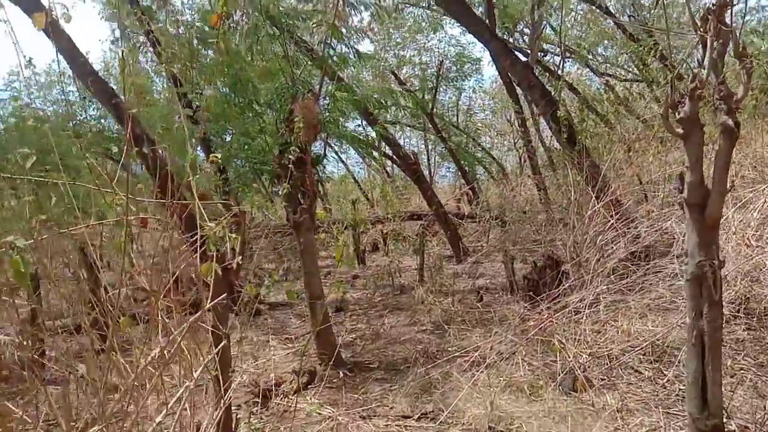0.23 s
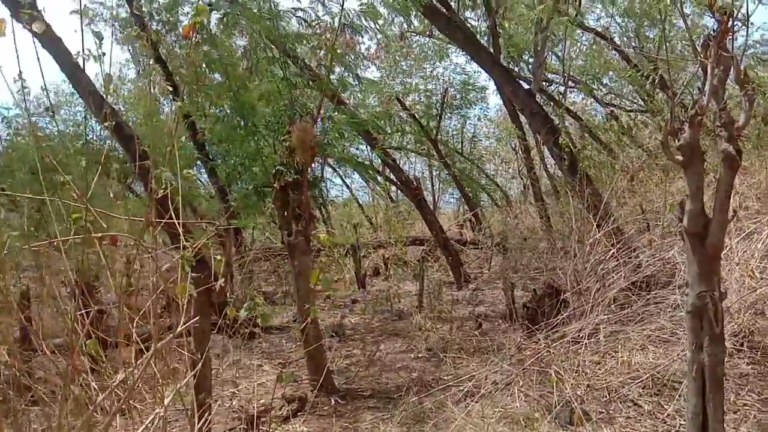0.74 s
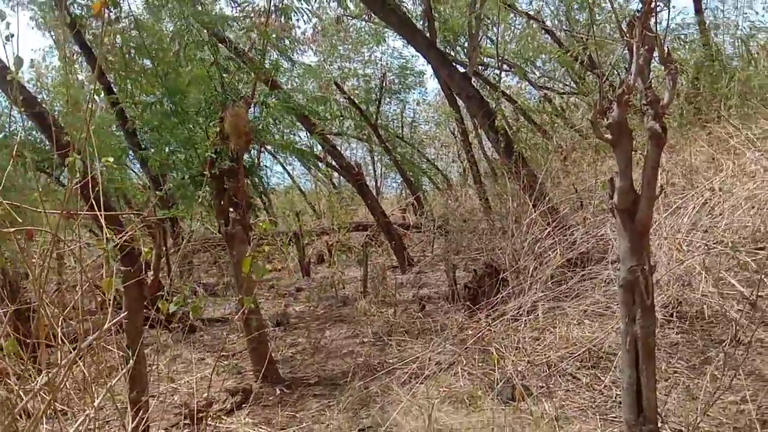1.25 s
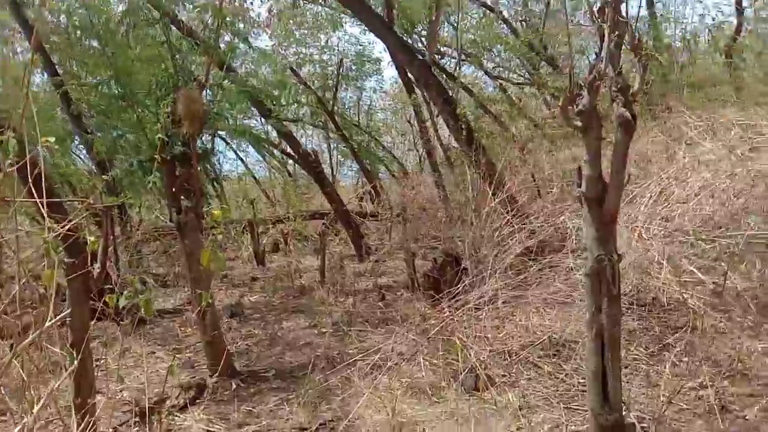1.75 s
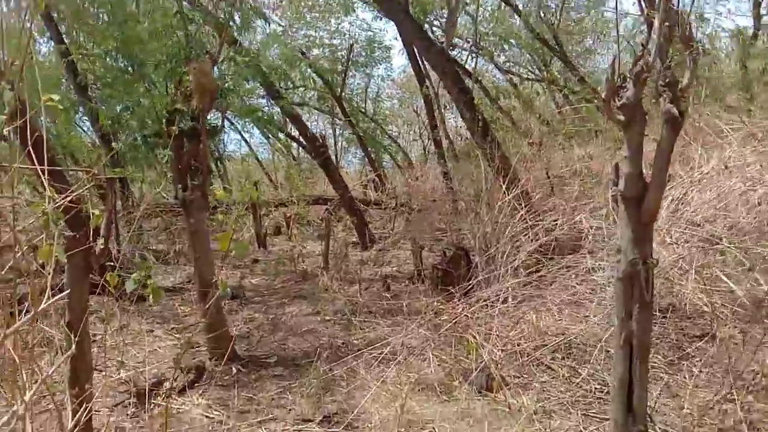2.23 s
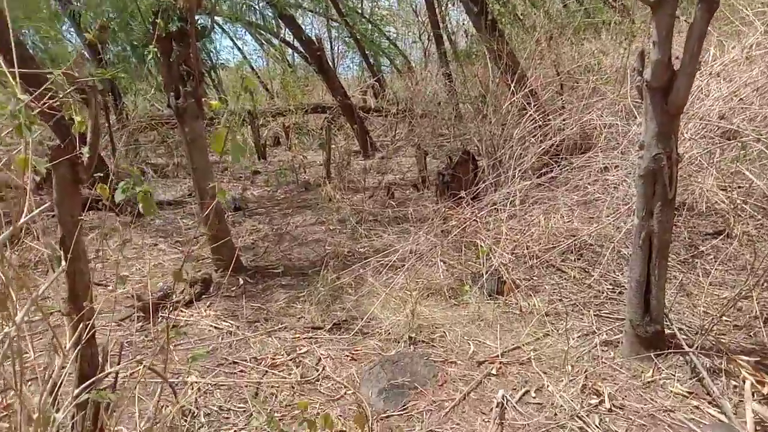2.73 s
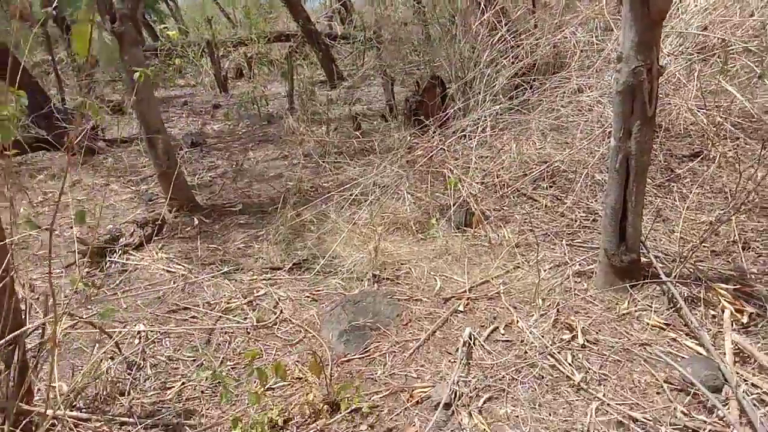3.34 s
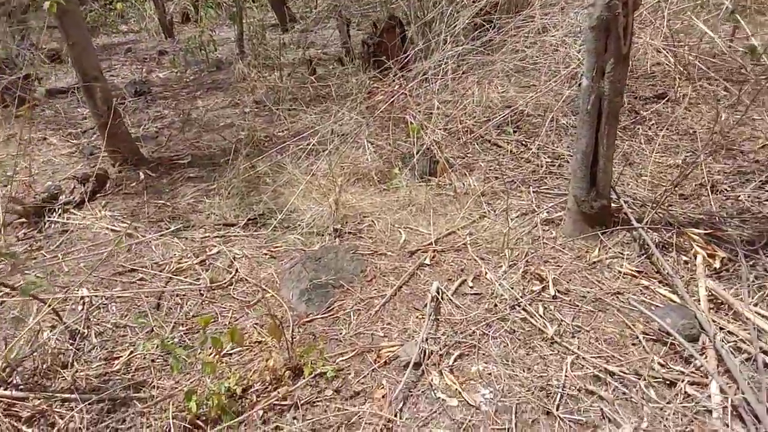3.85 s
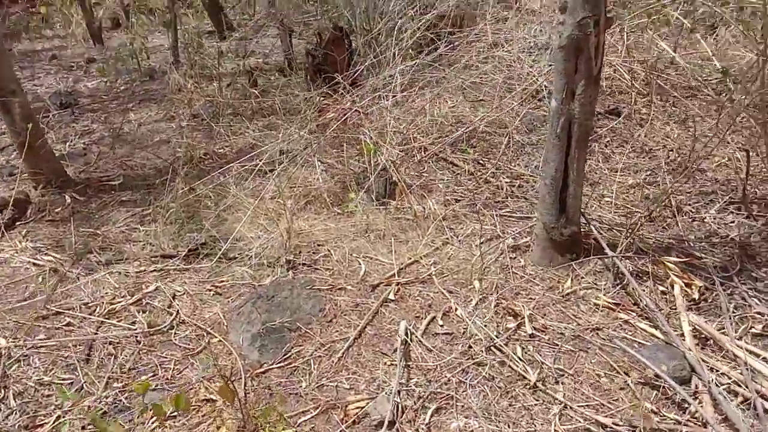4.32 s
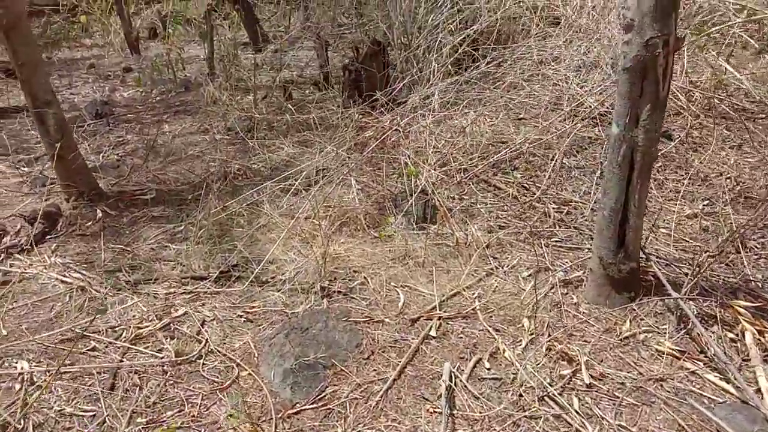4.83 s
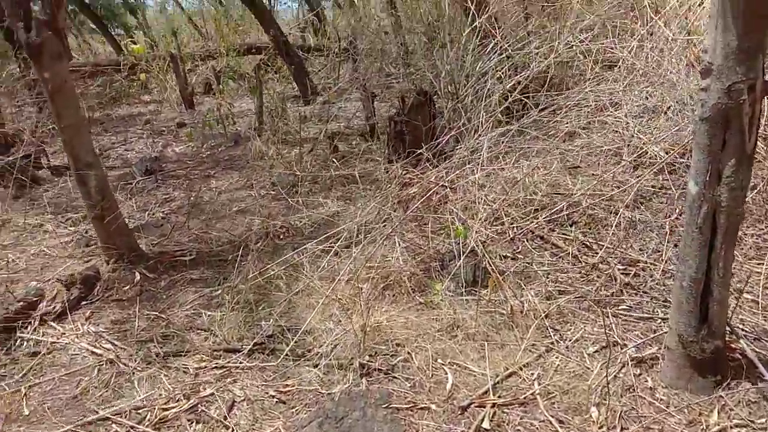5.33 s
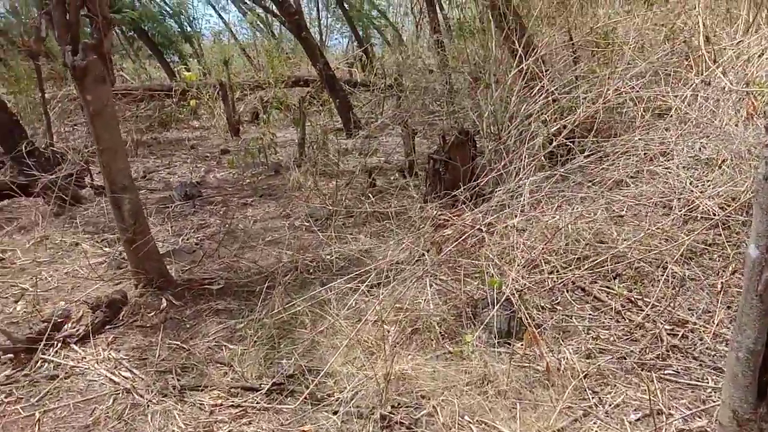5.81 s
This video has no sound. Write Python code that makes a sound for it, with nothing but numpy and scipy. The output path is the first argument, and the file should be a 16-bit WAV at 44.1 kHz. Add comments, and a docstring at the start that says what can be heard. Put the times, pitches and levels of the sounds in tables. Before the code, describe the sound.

Quiet dry woodland, with low air rumble and thin insect hiss. A few stalks rustle at first, with barely audible distant hoots, then a twig snaps. Soft bumps on the hand-held microphone follow. Around the middle, heavier steps crush dry grass into dense crisp crackle with woody snaps, and further crunching comes in bursts before fading to light rustle. The steps are close and central, from the ground below.

```python
"""Footsteps in dry woodland grass

Slow steps through dry grass and fallen twigs in quiet woodland, heard from a hand-held microphone.
Each step crushes stalks into a spray of tiny fractures; twigs snap as pulses with tearing fibres.
Stems scrape by stick and slip, and the hand bumps the case in low, short sways.
Filtered noise makes air rumble and far insect hiss; gliding tones make faint hoots.
The level dips briefly once near the start."""
import sys
import numpy as np
from scipy import signal
from scipy.fft import rfft, irfft
from scipy.io import wavfile
from scipy.ndimage import uniform_filter1d

SR = 44100
rng = np.random.default_rng(int(sys.argv[2]) if len(sys.argv) > 2 else 0)


def wav_record(signal):
    """Record a signal, one row per channel, as 16-bit PCM in the file named by sys.argv[1]."""
    frames = np.transpose(np.atleast_2d(signal))
    bounded = np.clip(frames, -1, 1)
    # unit amplitude maps onto the largest positive 16-bit level
    quanta = np.round(bounded * 32767).astype(np.int16)
    wavfile.write(sys.argv[1], SR, quanta)


N = 267775

# grass stirring between steps: crunch_db, crackle_db, splinters_db
STIR_LEVELS = (-63, -69, -83.5)


def from_db(db):
    """Decibels to an amplitude factor."""
    return 10 ** (np.asarray(db) / 20)


def rms_one(x):
    """Scale a sound to rms 1."""
    return x / np.sqrt(np.mean(x ** 2) + 1e-20)


def at_hz(points, hz):
    """Read a spectrum on a log-frequency axis."""
    point_hz, db = np.transpose(points)
    return np.interp(np.log(np.maximum(hz, 1)), np.log(point_hz), db)


def drift(rate_hz):
    """Slow random motion with rms 1: noise through two equal low-pass poles."""
    step = 40  # samples between drawn values
    pole = np.exp(-2 * np.pi * rate_hz * step / SR)
    noise = rng.standard_normal(N // step + 2002)
    slow = signal.lfilter([1], [1, -2 * pole, pole * pole], noise)[2000:]  # skip the settling
    return np.interp(np.arange(N) / step, np.arange(len(slow)), rms_one(slow))


def causal_pulse(spectrum, size=1024):
    """The most compact pulse that has this spectrum and nothing before its onset."""
    gain = from_db(at_hz(spectrum, np.fft.rfftfreq(size, 1 / SR)))
    # folding the cepstrum forward in time gives minimum phase
    cepstrum = irfft(np.log(gain))
    cepstrum[1:size // 2] *= 2
    cepstrum[size // 2 + 1:] = 0
    return irfft(np.exp(rfft(cepstrum)))


def coloured(x, spectrum):
    """Pass a sound through a smooth causal filter."""
    return signal.fftconvolve(x, causal_pulse(spectrum, size=4096))[:N]


def ring(x, hz, quality):
    """A resonance with gain 1 on top."""
    b, a = signal.iirpeak(min(hz, .45 * SR), max(quality, 1), fs=SR)
    return signal.lfilter(b, a, x + 1e-18)


def resonate(x, table):
    """A chain of peaks and notches, given as (pitch_hz, width_hz, gain_db)."""
    for hz, width_hz, db in table:
        half_gain = from_db(db / 2)
        width = np.pi * width_hz / SR
        turn = -2 * np.cos(2 * np.pi * hz / SR)
        b = [1 + width * half_gain, turn, 1 - width * half_gain]
        a = [1 + width / half_gain, turn, 1 - width / half_gain]
        x = signal.lfilter(b, a, x)
    return x


def add(out, s, sound):
    """Mix a sound in at time s."""
    i = max(round(s * SR), 0)
    out[i:i + len(sound)] += sound[:max(N - i, 0)]


def dying_noise(t60, size=8192):
    """A noise burst of unit energy that falls 60 dB in t60 seconds."""
    burst = rng.standard_normal(size) * from_db(-60 * np.arange(size) / (t60 * SR))
    return burst / np.linalg.norm(burst)


def fractures(per_s, size_db):
    """Random clicks, mostly small, at a rate that may vary in time; rms 1."""
    born = np.flatnonzero(rng.random(N) < per_s / SR)
    sizes = from_db(size_db * np.minimum(rng.exponential(1, len(born)), 4))
    clicks = np.zeros(N)
    clicks[born] = sizes * rng.choice([-1, 1], len(born))
    return rms_one(clicks)


def woodland(level_db=-1.86, patchy=0.52, quality=6.7):
    """Low air rumble and an insect hiss: filtered noise whose pitch bands swell and fade on their own."""
    # filter curve for still air and distant insects: pitch_hz, gain_db
    air_curve = [(25, -73), (50, -57.5), (90, -45.5), (180, -55.5), (400, -59), (750, -62.5), (1300, -60.5),
                 (2200, -60.5), (3700, -53.5), (5500, -60.5), (7200, -60), (8400, -87), (11500, -70),
                 (15000, -103)]
    # difference between left and right: pitch_hz, side gain_db
    side_curve = [(40, -11), (90, -23), (250, -10), (1300, -11.5), (2400, -26), (8000, -45), (14000, 0)]
    # the hiss is hollow at some pitches: pitch_hz, width_hz, gain_db
    hollows = [(1440, 74, -10), (1920, 73, 0), (4460, 1110, -9)]
    air = rng.standard_normal(N)
    patches = sum(drift(9) * ring(air, hz, quality) for hz in np.geomspace(1200, 7500, num=9))
    mid = coloured(resonate(air + patchy * patches, hollows), air_curve)
    side = coloured(coloured(rng.standard_normal(N), air_curve), side_curve)
    return from_db(level_db) * (mid + side * np.array([[1], [-1]]))


def hoots(blur_hz=55):
    """Soft gliding tones, blurred in level and phase on their way through the trees."""
    # faint far hoots: start_s, length_s, start_hz, end_hz, level_db
    calls = [(0.585, 0.2, 460, 365, -70), (0.931, 0.27, 420, 450, -71.5), (1.557, 0.256, 460, 413, -70.5)]
    out = np.zeros(N)
    blur = drift(blur_hz) + 1j * drift(blur_hz)
    for s, length, start_hz, end_hz, level_db in calls:
        n = int(length * SR)
        tone = np.exp(2j * np.pi * np.cumsum(np.linspace(start_hz, end_hz, n)) / SR)
        blurred = (tone * np.roll(blur, -int(s * SR))[:n]).real
        add(out, s, from_db(level_db) * signal.windows.tukey(n, .5) * blurred)
    return out


def bumps():
    """The case sways for a few slow cycles that swell and fade."""
    # soft bumps on the case: middle_s, level_db, pitch_hz, length_s
    knocks = [(1.935, -55, 132, 0.013), (2.069, -48.5, 90, 0.021), (2.138, -54, 90, 0.038),
              (2.158, -56, 138, 0.037), (2.212, -55, 107, 0.024), (2.234, -46, 90.5, 0.03),
              (4.156, -56.5, 86, 0.059)]
    out = np.zeros(N)
    for s, level_db, hz, length in knocks:
        t = np.arange(-length / 2, length / 2, 1 / SR)
        swell = np.cos(np.pi * t / length) ** 2
        add(out, s - length / 2, from_db(level_db) * swell * np.cos(2 * np.pi * hz * t))
    return out


def scrapes(slips_per_s=2700, quality=13.0):
    """One stiff stem sticks and slips on another and keeps it ringing."""
    # stems that scrape past each other: middle_s, length_s, level_db, pitch_hz
    stems = [(0.543, 0.0067, -49, 3020), (2.389, 0.02, -55, 4600), (2.464, 0.016, -51, 4860),
             (2.485, 0.034, -47, 5900)]
    out = np.zeros(N)
    slips = fractures(slips_per_s, size_db=4.0)
    for s, length, level_db, hz in stems:
        i, n = int(s * SR), int(length * SR)
        stem = rms_one(ring(slips[i:i + n], hz, quality))
        add(out, s - length / 2, from_db(level_db) * np.hanning(n) * stem)
    return out


def tread(press_db_per_s=420, release_db_per_s=170):
    """Crunch, crackle and splinter levels in dB: weight comes on quickly, stalks settle more slowly."""
    # a foot presses on the stalks or brushes through them:
    # full_weight_s, hold_s, woody crunch_db, crisp crackle_db, fine splinters_db
    presses = [(0.031, .02, -50.5, -57, -68.5), (0.131, .02, -56.5, -61, -71.5),
               (0.568, .01, -52, -69, -86), (1.779, .22, -48, -58.5, -75), (1.87, .035, -71, -53, -77),
               (2.147, .01, -49, -61, -76), (2.478, .01, -48.5, -52, -78), (2.84, .005, -38, -43, -54.5),
               (2.999, .225, -47, -47.5, -57.5), (3.32, .1, -69, -66, -73), (3.52, .08, -66, -61.5, -66),
               (3.831, .02, -51, -59, -67), (3.895, .1, -38, -42, -52), (4.08, .04, -44.5, -54, -61),
               (4.176, .035, -41, -51, -60), (4.28, .17, -54, -59, -71), (4.565, .08, -52, -56, -76),
               (4.82, .12, -55, -56, -71.5), (5.01, .04, -46, -51, -62), (5.079, .07, -46, -46, -54),
               (5.291, .03, -48, -46, -53), (5.37, .09, -52, -53, -62.5), (5.689, .09, -68.5, -62, -72.5),
               (5.941, .09, -70.5, -70, -74.5)]
    t = np.arange(N) / SR
    power = from_db(STIR_LEVELS)[:, None] ** 2
    for s, hold, *levels_db in presses:
        rise_db = -press_db_per_s * np.maximum(s - t, 0)
        fall_db = -release_db_per_s * np.maximum(t - s - hold, 0)
        power = power + np.outer(from_db(levels_db), from_db(rise_db + fall_db)) ** 2
    return 10 * np.log10(power)


def crackle(crunch, crisp, fine, per_s=1500, own_per_s=200, size_db=2.1, clump_db=4.0, shared=0.84,
            light_db=-72, even_s=0.049, low_db=-13, fine_db=-1.4):
    """Tiny fractures come in clumps; some ring in one pitch band of their own, some are broad clicks."""
    # corners of the tread spectrum: pitch_hz for the foot of the crunch, its low and high end,
    # the two ends of the crackle, and the splinters
    corner_hz = [620, 1400, 2500, 4300, 6000, 10300]
    clumps = from_db(clump_db * drift(45))
    broad = fractures(per_s * clumps, size_db)
    # under a light touch the blades rub more than they break
    rub = (.15 + from_db(np.minimum(light_db - crisp, 0))) * rng.standard_normal((2, N))
    levels = np.array([crunch + low_db, crunch, crunch, crisp, crisp, fine + fine_db])
    edges = np.linspace(np.sqrt(300), np.sqrt(16500), num=23) ** 2  # band edges, Hz
    out = np.zeros(N)
    for k, (low, high) in enumerate(zip(edges, edges[1:])):
        clicks = fractures(own_per_s * clumps, size_db) + shared * broad + rub[k % 2]
        # the foot's pressure sets the energy; chance only shares it out among the stalks
        clicks /= np.sqrt(np.abs(uniform_filter1d(clicks ** 2, int(even_s * SR))) + 1e-9)
        # read the tread spectrum at the band's middle, on a log-frequency axis
        middle = np.log(low * high) / 2
        shares = [np.interp(middle, np.log(corner_hz), row) for row in np.eye(len(levels))]
        band = signal.butter(2, [low, high], "band", fs=SR, output="sos")
        out += signal.sosfilt(band, clicks * from_db(shares @ levels))
    return out


def thin_twigs(crisp_db, count=100, crowding=0.75, follows=0.5, spread_db=1.5, colour_spread_db=6.5,
               firm_db=-43.5):
    """Thin twigs break at random, more often and louder the harder the foot presses."""
    # a typical thin twig when the crackle is at firm_db:
    # knock_db, wood_db, crack_db, splinter_db, energy share of the tearing fibres (0-1)
    typical = (-46.5, -25.5, -24.5, -34.5, 0.37)
    chance = np.cumsum(np.maximum(from_db(crisp_db) - from_db(STIR_LEVELS[1]), 0) ** crowding)
    # one draw in each equal slice of the total chance
    draws = (np.arange(count) + rng.random(count)) / count
    at = np.searchsorted(chance / chance[-1], draws)
    size_db = follows * (crisp_db[at] - firm_db) + spread_db * rng.standard_normal(count)
    colour_db = colour_spread_db * rng.uniform(-1.13, 1, (count, 4))
    levels = np.array(typical[:-1]) + size_db[:, None] + colour_db
    return [(i / SR, *row, typical[-1]) for i, row in zip(at, levels)]


def snaps(twigs, tear_t60=0.016, fibre_db=0.5, fibre_hz=1000, ring_gain=0.17, quality=58.0,
          bass_db=-11, knock_db=-3, wood_db=-0.3, level_db=0.02):
    """A twig gives way in one sharp pulse, its last fibres tear after it, and its pieces ring briefly."""
    # corners of a snap's spectrum: pitch_hz for the ends of the knock, the ends of the wood,
    # the valley, the ends of the crack, and the splinter
    corner_hz = [450, 800, 1300, 1800, 3050, 4000, 6000, 12000]
    out = np.zeros(N)
    # thin fibres carry no bass
    no_bass = signal.butter(2, fibre_hz, "high", fs=SR, output="sos")
    for s, knock, wood, crack, splinter, tear in twigs:
        tear = np.clip(tear, 0, 1)
        roughness = from_db(fibre_db * np.clip(rng.standard_normal(1024), -2, 2))
        fibres = signal.sosfilt(no_bass, dying_noise(tear_t60, size=1024) * roughness)
        fracture = np.sqrt(tear) * fibres / np.linalg.norm(fibres)
        fracture[0] += np.sqrt(1 - tear)  # the sharp pulse
        piece_hz = 3700 * 2 ** rng.random()
        fracture = fracture + ring_gain * ring(fracture, piece_hz, quality)
        # the thick wood sounds low, the break itself high; the valley takes the weaker of the two
        colour_db = [knock, knock + knock_db, wood + wood_db, wood, min(wood, crack), crack, crack, splinter]
        spectrum = [(100, knock + bass_db), *zip(corner_hz, colour_db)]
        add(out, s, np.convolve(causal_pulse(spectrum), fracture))
    return from_db(level_db) * out


def scatter(x, t60, wet_db):
    """Ground and trunks throw back a short, thin tail."""
    return from_db(wet_db) * signal.fftconvolve(x, dying_noise(t60))[:N]


def scene():
    """The feet are straight below the microphone, so they sound in the middle of the wide woodland."""
    # the loudest twigs: start_s, knock_db, wood_db, crack_db, splinter_db,
    # energy share of the tearing fibres (0-1)
    loud_twigs = [(0.533, -52, -48, -52, -36, 0.3), (0.5746, -28, -15.5, -38.5, -58, 0.46),
                  (0.6136, -29, -47, -39, -36, 0), (1.5904, -1, -6.5, -23.5, -58, 0.08),
                  (1.7718, -27, -11.5, -28.5, -66, 0.9), (1.8729, -54, -17.5, -19.5, -46, 0.5),
                  (1.899, -48, -33, -27, -53, 0.7), (1.9362, -49, -31, -19, -42, 0.33),
                  (1.99, -62, -1, -15, -46, 1), (2.1573, -19, -23, -23, -33, 0.6),
                  (2.3918, -45, -35, -21.5, -45, 0.76), (2.472, -41, -29, -15.5, -31, 0.4),
                  (2.8416, -28, -11, -9, -23, 0.33), (2.9568, -19, -10, -21, -32, 0.73),
                  (2.9974, -40, -24, -20, -32, 0.4), (3.0175, -43, -29, -13, -24, 0),
                  (3.0472, -42, -34, -15.5, -36, 0.6), (3.092, -45, -41, -15.5, -47, 0.05),
                  (3.111, -44, -29, -16, -28, 0), (3.2017, -54, -52, -16, -26, 0),
                  (3.363, -47, -31, -22.5, -38, 0), (3.4864, -52, -43, -24, -35, 0.95),
                  (3.5523, -48, -35, -29.5, -26, 0.2), (3.9016, -16.5, -0.5, -29, -27, 0.15),
                  (3.9551, -10, 1.5, -22, -39, 0.9), (4.0035, -27, -5, -40, -20, 0.05),
                  (4.1521, -3, 13, -15.5, -24, 0.06), (4.181, -31, -8, -44, -50, 0.2),
                  (4.1935, -14, -1, -21.5, -24, 0.86), (4.5596, -33, -16, -27.5, -66, 0.73),
                  (4.2859, -48, -15.5, -18, -28, 0.03), (4.4712, -54, -29.5, -19, -59, 0.5),
                  (4.6653, -10.5, -9, -51, -54, 0.76), (4.9925, -20, -5, -9, -63, 0),
                  (5.08, -45, -28, -22, -24, 0.5), (5.1505, -20, -17, -12, -17.5, 0.88),
                  (5.2036, -45, -50, -19.5, -31, 0.3), (5.249, -28, -22, -16, -25, 0.76),
                  (5.3103, -48, -17, -13, -29, 0.95), (5.323, -39, -22, -17, -15, 0.5),
                  (5.4456, -51, -39, -23, -21, 0.1), (5.6936, -40, -42, -25.5, -29.5, 0)]
    # the level dips briefly: middle_s, width_s, depth_db
    level_dip = (0.849, 0.0061, -12.5)
    crunch, crisp, fine = tread()
    feet = crackle(crunch, crisp, fine) + snaps(loud_twigs + thin_twigs(crisp)) + scrapes()
    tail = scatter(feet, t60=0.077, wet_db=-10.0)
    s, width, depth_db = level_dip
    dip = from_db(depth_db * np.exp(-((np.arange(N) / SR - s) / width) ** 2))
    return (feet + tail + bumps() + hoots() + woodland()) * dip


def record(dry):
    """The microphone port rings and colours everything; the top is cut."""
    # resonances and notches of the port: pitch_hz, width_hz, gain_db
    port = [(1241, 108, 10.5), (2680, 560, 7), (3145, 720, -6), (3775, 500, 4), (5650, 2520, 21),
            (6663, 473, -17), (7509, 690, 8), (12070, 3680, -10.5), (14850, 2010, 23.5)]
    cutoff_hz = 15600
    top_cut = signal.ellip(10, .2, 70, cutoff_hz, fs=SR, output="sos")
    return signal.sosfilt(top_cut, resonate(dry, port))


dry = scene()
out = record(dry)
wav_record(out)
```